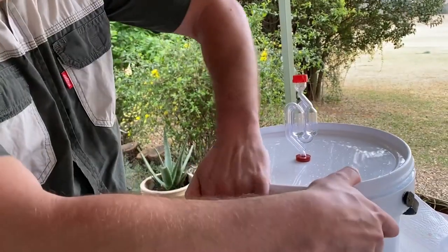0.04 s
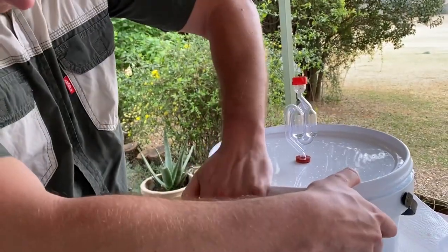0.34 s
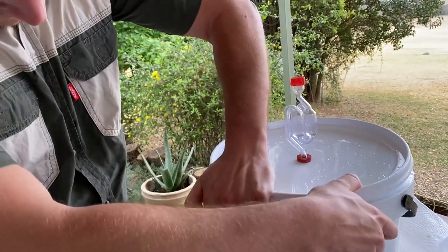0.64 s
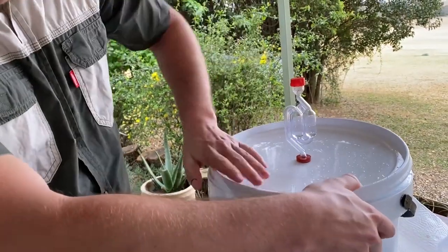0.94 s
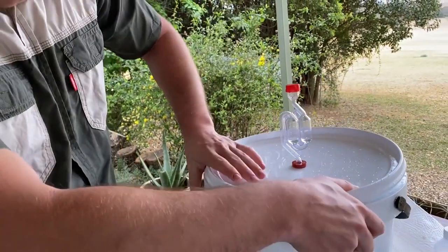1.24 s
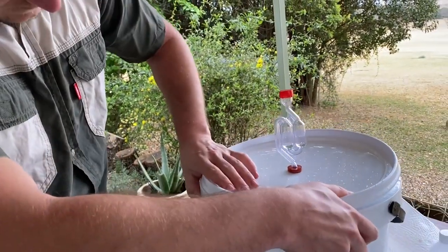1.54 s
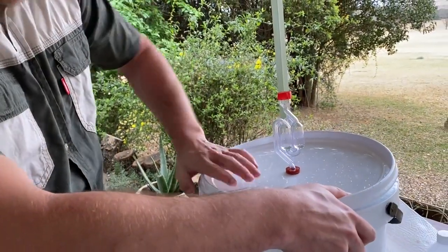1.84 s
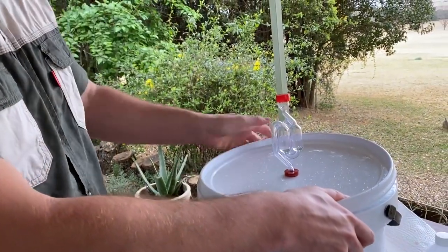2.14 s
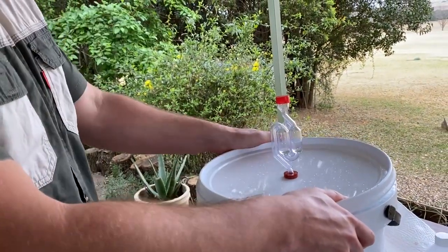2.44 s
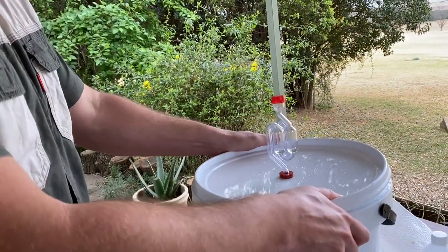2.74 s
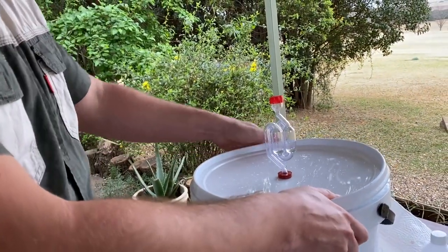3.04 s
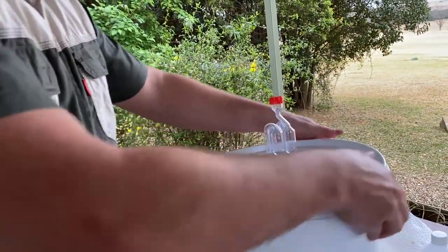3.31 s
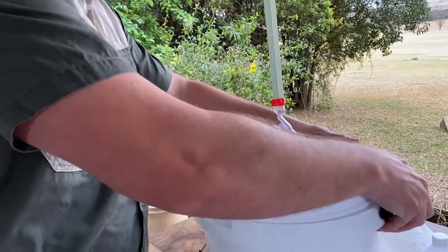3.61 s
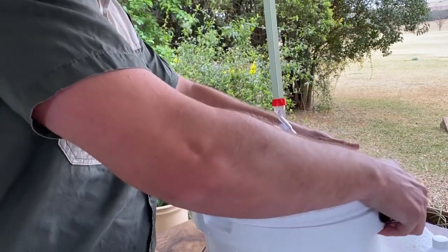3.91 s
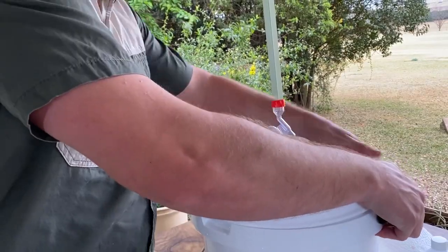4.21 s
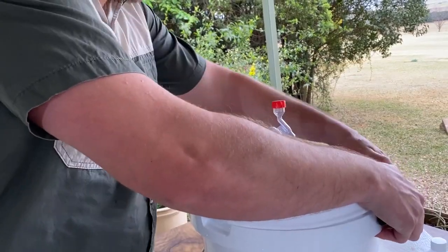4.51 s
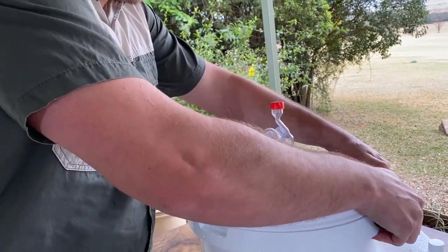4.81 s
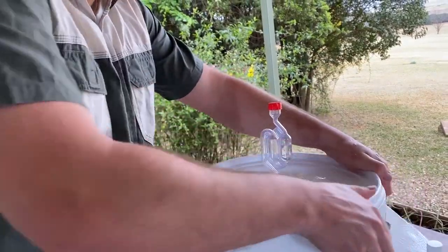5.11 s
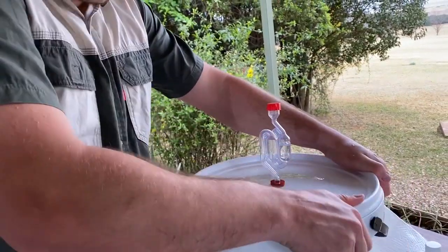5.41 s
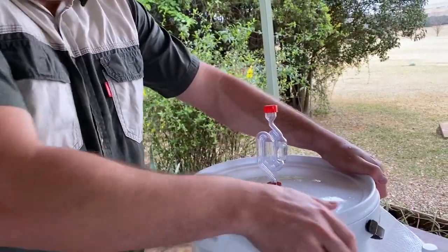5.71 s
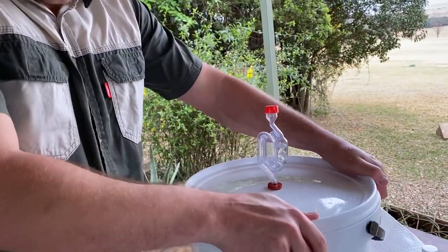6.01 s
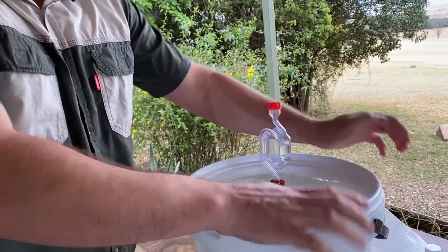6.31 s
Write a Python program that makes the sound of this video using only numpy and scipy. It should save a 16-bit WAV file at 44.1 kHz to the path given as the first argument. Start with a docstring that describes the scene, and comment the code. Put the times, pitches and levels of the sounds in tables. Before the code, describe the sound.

A plastic lid is pressed onto a bucket close to the microphone, on a porch with faint outdoor air and a low hum. It opens with a light sleeve brush, a rim tick and a soft palm thud. At 0.5 seconds a very short scrape ends in the loudest snap, a sharp crack with a hollow boom and a brief echo. A second strong snap comes at 1.6 seconds, and softer ones at 2.7, 3.8 and 4.7. Between them the rim ticks and creaks, palms thud dully, fingers rub with faint squeaks and cloth stirs. The ticks and thuds get busier from 3.6 seconds, with a sharp click at about 5.1. A distant bird gives a thin falling whistle at 2.7 seconds and several more between 4.8 and 5.8. A last finger rub, tick and light thud come at 6.3 seconds.

```python
"""On a porch by a garden, close to a two-port microphone, a plastic fermenting bucket's lid is pressed home.
Over outdoor air and a low hum, a sleeve brushes, the rim ticks and a palm thuds. At 0.5 s the bead
scrapes over the lip and snaps in, with a crack, a flex of the lid and a boom of the bucket. Four softer
snaps follow about a second apart, with ticks, thuds and rubbing fingers between them. From 2.7 s a far
bird whistles now and then; the hands press a last time at 6.3 s."""
import sys
import numpy as np
from scipy import signal
from scipy.fft import rfft, irfft
from scipy.io import wavfile

SR = 44100
rng = np.random.default_rng(int(sys.argv[2]) if len(sys.argv) > 2 else 0)


def dump_mix(stems):
    """Bounce the given channels to the path in sys.argv[1] as a 16-bit WAV at rate SR."""
    frames = np.atleast_2d(stems).T  # one column per channel
    limited = np.clip(frames, -1, 1)  # hard clip at full scale
    pcm = np.round(limited * 32767).astype(np.int16)
    wavfile.write(sys.argv[1], SR, pcm)


N = 280123

# spectrum of plastic slipping on plastic: f/Hz, relative level/dB
SLIP_SPECTRUM = [(100, -10.5), (400, -3.5), (750, -2), (950, -3), (1400, 2), (1900, -1.5), (2400, -2),
                 (3050, -4.5), (4400, -6.5), (5600, -8.5), (7000, -6), (8500, -11), (10000, -12.5),
                 (16000, -23)]


def snaps(directions=3, length_s=0.00135, quickening=0.35):
    """The bead jumps the lip; the crack leaves in several directions, each with its own grain and echo."""
    # snaps: t/s, crack/dB, tilt/(dB/octave), rim ring/Hz, rim ring/dB, skirt knock/Hz, skirt knock/dB,
    # lid flex/Hz, lid flex/dB, wall modes/dB, air cushion/dB, deep sway/dB, echo against the crack/dB
    jumps = [(0.5237, -1, 1, 1548, 1, 666.5, -5, 256.4, 3.5, -14, -34, -20, 3),
             (1.5711, -4, 0.45, 2330, -9.5, 1446, -16, 205, -3.5, -17, -43.5, -17.5, -0.5),
             (2.6916, -17, 0.7, 3120, -26.5, 916, -17, 228.3, -7, -19.5, -19.5, -21.5, 6.5),
             (3.8216, -12, 1, 2310, -19.5, 410, -34, 189, -16, -10, -24, -24, 1.5),
             (4.6814, -23.5, .5, 2300, -34, 380, -10.5, 169, -9, -17, -39, -18.5, 11.5)]
    # rim modes struck by every snap: f/Hz, level against the crack/dB, t60/s
    rim_modes = [(3100, -8, 0.016), (6330, -21.5, .008)]
    direct, wet = np.zeros((2, 2, N))
    for s, crack_db, tilt_db, rim_hz, rim_db, knock_hz, knock_db, *bucket, sway_db, echo_db in jumps:
        decay_s = length_s * amp(-quickening * crack_db)  # the harder, the sooner over
        slip = crack_db, decay_s, tilt_db, rim_hz, rim_db
        body = boom(*bucket) + sway(sway_db)
        body += ring(knock_hz, knock_db, t60=0.0099, turn=0.2)
        body += sum(ring(hz, crack_db + db, t60) for hz, db, t60 in rim_modes)
        add(direct, s, crack(*slip, ring_t60=0.014))
        add(direct, s, body)
        add(wet, s, echoes(body))
        for _ in range(directions):
            add(wet, s, amp(echo_db) / np.sqrt(directions) * echoes(crack(*slip)))
    return direct, wet


def crack(db, decay_s, tilt_db, ring_hz, ring_db, ring_t60=0.0078, size=2048):
    """A burst of tiny slips, and the short ring of the stretch of rim where they happen."""
    t = np.arange(size) / SR
    fade = np.exp(-t / decay_s) * (1 - np.exp(-t / (0.2 * decay_s)))
    burst = port_noise(size, likeness=0.93) * fade
    burst *= 1.05 * np.linalg.norm(fade) / np.linalg.norm(burst, axis=1, keepdims=True)
    sound = amp(db) * colour(burst, SLIP_SPECTRUM, tilt_db)
    return sound + ring(ring_hz, ring_db, ring_t60, turn=0.13, size=sound.shape[1])


def boom(flex_hz, flex_db, wall_db, cushion_db):
    """The lid flexes, feeding the wall modes near its own pitch, and bounces on the air inside."""
    # modes of the bucket wall and lid: f/Hz, relative level/dB, t60/s
    wall_modes = [(140, 4, 0.34), (161.6, 0.5, 0.29), (193.3, -7, 0.15), (222, -5, 0.2), (272, -1.5, 0.077),
                  (311, -9.5, 0.11), (441, -17.5, .16), (487, -18.5, .18), (565, -23.5, 0.094),
                  (651, -21, 0.18), (753, -17.5, 0.17)]
    sound = ring(flex_hz, flex_db, t60=0.066, turn=0.5) + ring(70, cushion_db, t60=0.67, turn=1.3)
    for (hz, db, t60), scatter in zip(wall_modes, rng.standard_normal(len(wall_modes))):
        mismatch_db = -7 * min(abs(np.log2(hz / flex_hz)), 1)
        mode = ring(hz, wall_db + db + mismatch_db, t60, turn=290 / hz + 0.79 * scatter)
        sound += mode * rng.choice([-1, 1])
    return sound


def sway(db, from_hz=130, to_hz=30, fall_s=0.038, peak_s=0.074):
    """Slow bending waves: the lower they are, the later they arrive, so the boom sinks in pitch."""
    t = np.arange(SR) / SR
    cycles = np.cumsum(to_hz + (from_hz - to_hz) * np.exp(-t / fall_s)) / SR
    lag = 1.8 * (1 - np.exp(-t / peak_s)) * np.array([[1], [-1]])  # near field: the ports drift apart
    envelope = t / peak_s * np.exp(1 - t / peak_s)
    return amp(db) * envelope * np.sin(2 * np.pi * cycles + lag)


def ring(hz, db, t60, turn=0, size=SR):
    """A struck mode; the two ports hear it `turn` radians out of step."""
    t = np.arange(size) / SR
    swing = np.sin(2 * np.pi * hz * t + np.array([[turn], [-turn]]) / 2)
    return amp(db - 60 * t / t60) * swing * (1 - np.exp(-4 * hz * t))


def tick(db, tilt_db, ring_hz, ring_db, length_s=0.0003, quickening=0.55):
    """A small slip of the rim: the harder, the shorter."""
    return crack(db, length_s * amp(-quickening * db), tilt_db, ring_hz, ring_db)


def rim_ticks():
    """The rim gives in small slips under the hands."""
    # slips: t/s, level/dB, tilt/(dB/octave), ring/Hz, ring/dB
    slips = [(0.091, -27.5, -2, 1580, -23.5), (0.2465, -53.5, -7.5, 1465, -44),
             (0.451, -37.5, -4, 1370, -61.5), (0.796, -48.5, 1.5, 1260, -31), (0.811, -43, 0, 1520, -34.5),
             (1.1832, -39, -11, 1200, -50), (1.201, -43.5, 1, 1150, -60), (1.2218, -43.5, -1, 1220, -56),
             (1.941, -44, 1, 1535, -56), (1.952, -43.5, -1, 1496, -46.5),
             (2.2325, -37.5, -1.5, 1180, -44.5), (3.1976, -42, -8, 1397, -42.5),
             (3.2797, -50.5, -6, 1415, -55.5), (3.584, -35.5, 0, 1020, -25.5),
             (3.608, -40, -5.5, 1120, -52), (3.743, -31, -.5, 1150, -42), (3.9888, -25, -3.5, 1222, -13.5),
             (4.0784, -41, -10, 1080, -40), (4.202, -56, -3.5, 1220, -38), (4.626, -28, -6, 1720, -37),
             (4.635, -25, -9.5, 1616, -40), (4.644, -18, -.5, 1630, -41), (5.016, -36.5, -3, 1600, -33),
             (5.119, -44.5, -2, 1220, -29.5), (5.1474, -15, 3.5, 945, -21), (5.149, -22.5, -8, 1210, -12),
             (5.171, -27.5, -4.5, 1080, -37), (5.2459, -31, -0.5, 1101, -24.5),
             (6.303, -44, 1.5, 1520, -56), (6.3166, -30.5, -3.5, 900, -50)]
    mix = np.zeros((2, N))
    for s, *slip in slips:
        add(mix, s, tick(*slip))
    return mix


def palm_thuds():
    """A palm bears down on the lid and the bucket booms softly."""
    # presses: t/s, lid flex/dB, lid flex/Hz, air cushion/dB
    presses = [(0.095, -36.5, 149, -39.5), (0.81, -48.5, 198.7, -32.5), (1.198, -33, 222, -51.5),
               (1.222, -32.5, 220, -55), (1.82, -27.5, 165, -30.5), (2.291, -50, 108, -37),
               (2.446, -44, 251, -49), (3.585, -33, 202, -36.5), (3.746, -21, 174, -28.5),
               (3.987, -34, 196, -36), (4.195, -45.5, 100, -36.5), (4.428, -36.5, 137, -47),
               (4.738, -38.5, 70, -41), (5.019, -32, 105, -29.5), (5.149, -31.5, 237, -49),
               (5.245, -36, 293, -40), (5.464, -39, 92, -32), (5.716, -39.5, 120, -47),
               (6.316, -33, 175, -61)]
    mix = np.zeros((2, N))
    for s, db, flex_hz, cushion_db in presses:
        add(mix, s, boom(flex_hz, db, wall_db=db - 3, cushion_db=cushion_db))
    return mix


def bead_scrapes(growth_db=24.5):
    """The bead grinds over the lip, louder and louder until it gives."""
    # scrapes: start/s, end/s, final level/dB
    scrapes = [(0.507, 0.522, -29.5), (1.563, 1.573, -28), (3.817, 3.833, -25.5), (4.602, 4.643, -35.5),
               (4.66, 4.688, -30.5), (4.99, 5.014, -54)]
    mix = np.zeros((2, N))
    for start, end, db in scrapes:
        grains = grind(start, end, SLIP_SPECTRUM, grain_db=-1.0)
        add(mix, start, grains * amp(db + growth_db * np.linspace(-1, 0, grains.shape[1])))
    return mix


def finger_rubs():
    """Skin slips on the plastic with a low and a high squeak."""
    # rubs: start/s, end/s, low squeak/dB, high squeak/dB
    rubs = [(0.776, 0.823, -50.5, -61.5), (1.045, 1.121, -80, -65), (1.502, 1.54, -55, -71),
            (1.781, 1.831, -52, -64), (2.285, 2.301, -57.5, -62), (3.056, 3.112, -59.5, -71),
            (3.909, 4.02, -52, -68), (4.19, 4.236, -72, -55.5), (4.252, 4.272, -59, -50.5),
            (4.27, 4.334, -58, -54.5), (5.133, 5.168, -47, -75), (6.251, 6.3, -44.5, -48.5)]
    # spectra of the two squeaks: f/Hz, relative level/dB
    low_squeak = [(200, -12), (800, -7), (1400, -4.5), (1900, -8.5), (2700, -18), (8000, -51.5)]
    high_squeak = [(1000, -43.5), (4800, -11.5), (6100, 3), (7000, 3), (8200, -9.5), (11000, -8.5),
                   (13500, -10), (16000, -13)]
    mix = np.zeros((2, N))
    for start, end, low_db, high_db in rubs:
        low = amp(low_db) * grind(start, end, low_squeak, grain_db=4.5)
        high = amp(high_db) * grind(start, end, high_squeak, grain_db=4.5)
        add(mix, start, (low + high) * signal.windows.tukey(low.shape[1], 0.5))
    return mix


def grind(start, end, spectrum, grain_db, size=8192):
    """Stick and slip: a dense run of grains of uneven size."""
    count = int(np.clip((end - start) * SR, 64, size))
    grains = port_noise(size, likeness=0.7)
    grains *= amp(grain_db * np.repeat(rng.standard_normal(size // 32), 32))
    return unit_rms(colour(grains, spectrum)[:, :count])


def rim_creaks(per_s=2, mean_db=-58, spread_db=6.5):
    """The strained rim creaks faintly at random moments."""
    mix = np.zeros((2, N))
    for when, force in rng.random((round(per_s * N / SR), 2)):
        db = mean_db + spread_db * (2 * force - 1)
        add(mix, when * N / SR, tick(db, tilt_db=-3, ring_hz=1140, ring_db=db))
    return mix


def ports(x, right_delay_s=1.9e-5):
    """The bucket is close and to one side: each port has its own colour, and the right hears it later."""
    # the bucket's near field at the microphone: f/Hz, left over right/dB
    balance = [(60, -1.5), (110, -2.5), (200, -1), (380, 2.5), (700, 2.0), (1290, 1.5), (2380, 2.0),
               (4400, 3.5), (8120, 0), (15000, 1.0)]
    hz = np.fft.rfftfreq(N, 1 / SR)
    lean = amp(read(balance, hz) / 2)
    delay = np.exp(-2j * np.pi * hz * right_delay_s)
    return irfft(rfft(x) * np.array([lean, delay / lean]), N)


def echoes(x):
    """A sound rings on briefly in the plastic shell, and longer under the porch roof."""
    # echo bands of the two spaces: f/Hz, level/dB, t60/s
    shell = [(59.6, -13.5, 0.17), (245, -11.5, 0.021), (505.6, -2.5, 0.14), (1500, -7, .05),
             (4000, -10, 0.044), (12000, -15, .035)]
    porch = [(50, -1, 0.59), (202.2, -14.5, 0.2), (398, 0.5, 0.19), (660, -16, 0.8), (1500, -15.5, 0.27),
             (3500, -16, 0.3), (7000, -18, 0.25), (14000, -18, 0.2)]
    return tail(x, shell, onset_s=0.0029, likeness=0.85) + tail(x, porch, onset_s=0.01, likeness=1.0)


def tail(x, bands, onset_s, likeness, unrelated_hz=8000, size=24576):
    """Dense echoes from all sides; each band dies at its own speed, and the treble is the widest."""
    hz, t, noise = signal.stft(rng.standard_normal((2, size)), SR, nperseg=256)
    field = correlate(noise, likeness * np.sinc(hz / unrelated_hz)[:, None])
    t60 = np.maximum(read(bands, hz, column=2), 0.01)[:, None]
    decay = amp(read(bands, hz)[:, None] - 60 * t / t60)
    equal_energy = np.sqrt(2 * np.log(1000) / (t60 * SR))
    taps = signal.istft(field * decay * equal_energy, SR, nperseg=256)[1]
    taps *= 1 - np.exp(-(np.arange(taps.shape[1]) / SR / onset_s) ** 2)
    return signal.fftconvolve(x, taps, axes=1)[:, :N]


def sleeves(half_width_s=0.12, rest_db=-73.5):
    """A sleeve brushes the shirt as an arm moves; the cloth stirs faintly in between."""
    # brushes: peak t/s, level/dB
    brushes = [(0.03, -59), (1.169, -63), (1.87, -59.5), (2.47, -65), (2.98, -63), (3.68, -59.5),
               (4.34, -65.5), (5.1, -68.5), (6.28, -57.5)]
    # spectrum of shirt cloth: f/Hz, relative level/dB
    cloth = [(100, 1.5), (300, 9), (600, 1), (1200, 0), (2500, -4), (5000, -9), (8000, -10), (15000, -26)]
    t = np.arange(N) / SR
    fibres = colour(port_noise(N, likeness=0.6), cloth)[:, :N] * swell(rate_hz=25, depth_db=2)
    brush_power = sum(amp(db) ** 2 * np.exp(-((t - s) / half_width_s) ** 2) for s, db in brushes)
    return unit_rms(fibres) * np.sqrt(amp(rest_db) ** 2 + brush_power)


def bird(fall_octaves_per_s=0.96):
    """Far off, thin whistles that all fall at one rate, smeared by the trees."""
    # whistles: t/s, length/s, starting f/Hz, relative level/dB, blur/Hz
    whistles = [(2.712, 0.15, 2170, -55.5, 220), (4.822, 0.087, 2120, -59, 60.4),
                (4.878, 0.084, 2048, -53.5, 69.3), (5.335, .11, 3006, -55.5, 420),
                (5.457, 0.11, 2804, -58.5, 350), (5.656, 0.076, 2533, -54, 221),
                (5.733, 0.055, 2370, -59, 200)]
    trees = [(1002, -3.5, 0.39), (4030, -6, 1.0)]  # echo bands: f/Hz, level/dB, t60/s
    song = np.zeros((2, N))
    for start, length, from_hz, db, blur_hz in whistles:
        hz = from_hz * 2 ** (-fall_octaves_per_s * np.arange(0, length, 1 / SR))
        add(song, start, amp(db) * fuzzy_tone(hz, blur_hz) * signal.windows.tukey(len(hz), 0.6))
    return amp(-6) * song + tail(song, trees, onset_s=0.012, likeness=0.49)


def garden(air_db=-64.5, rumble_below_hz=300):
    """Outdoor air beyond the porch, with a softly gusting rumble."""
    # spectrum of the outdoor air: f/Hz, relative level/dB
    air_spectrum = [(15, -2.5), (27, -3.5), (42, -10.5), (62, -20), (90, -31.5), (130, -28.5), (250, -39),
                    (420, -47.5), (900, -47.5), (1600, -50.5), (2300, -51), (4000, -54), (7500, -58),
                    (9500, -63.5), (15500, -65.5)]
    # how alike the two ports hear it: f/Hz, correlation
    likeness = [(25, -0.69), (45, -0.31), (70, .85), (150, .1), (300, .1), (800, .55), (3000, 0.19),
                (12000, -.1)]
    hz = np.fft.rfftfreq(N, 1 / SR)
    field = correlate(rfft(rng.standard_normal((2, N))), read(likeness, hz))
    field *= amp(read(air_spectrum, hz))
    air = irfft(field * (hz >= rumble_below_hz), N)
    rumble = irfft(field * (hz < rumble_below_hz), N) * swell(rate_hz=2.4, depth_db=3.5)
    return amp(air_db) * (air + rumble) / np.std(air.mean(0))


def hum(hz=68.5):
    """A low hum in the background: a steady tone under a wavering one."""
    pitch = np.full(N, hz)
    steady = np.sin(2 * np.pi * np.cumsum(pitch) / SR)
    return amp(-65.5) * steady + amp(-58.5) * fuzzy_tone(pitch, width_hz=15)


def fuzzy_tone(hz, width_hz):
    """A narrow band of noise that follows the pitch curve hz."""
    band = np.exp(-(np.fft.fftfreq(N, 1 / SR) / width_hz) ** 2)
    waver = np.fft.ifft(np.fft.fft(rng.standard_normal(N)) * band)[:len(hz)]
    return unit_rms((waver * np.exp(2j * np.pi * np.cumsum(hz) / SR)).real)


def swell(rate_hz, depth_db):
    """A gain that drifts at random."""
    knots = rng.standard_normal(256)
    return amp(depth_db * np.interp(np.arange(N) / SR * rate_hz, np.arange(256), knots))


def colour(x, spectrum, tilt_db=0, size=2048):
    """Causal filter of unit power with the given spectrum, tilted by tilt_db an octave above 500 Hz."""
    hz = abs(np.fft.fftfreq(size, 1 / SR))
    octaves = np.log2(np.maximum(hz, 500) / 2000)
    log_gain = np.log(amp(read(spectrum, hz) + tilt_db * octaves))
    taps = np.fft.ifft(np.exp(np.conj(signal.hilbert(log_gain)))).real
    return signal.fftconvolve(x, taps[None] / np.linalg.norm(taps), axes=1)


def port_noise(count, likeness):
    """White noise at the two microphone ports, partly alike."""
    return correlate(rng.standard_normal((2, count)), likeness)


def correlate(noises, likeness):
    """Blends two unrelated noises into a left and a right with the given correlation."""
    left, other = noises
    likeness = np.clip(likeness, -1, 1)
    return np.array([left, likeness * left + np.sqrt(1 - likeness ** 2) * other])


def read(table, hz, column=1):
    """One column of a table, interpolated on a log-frequency axis."""
    table = np.array(table, float)
    return np.interp(np.log(hz + 1), np.log(table[:, 0] + 1), table[:, column])


def add(mix, s, sound):
    """Lays a sound into the mix at time s."""
    part = mix[:, max(round(s * SR), 0):][:, :sound.shape[-1]]
    part += sound[..., :part.shape[1]]


def amp(db):
    """Decibels to gain."""
    return 10 ** (np.asarray(db) / 20)


def unit_rms(x):
    """Scales to rms 1."""
    return x / np.sqrt(np.mean(x ** 2) + 1e-20)


def scene():
    """Bucket and hands close to the microphone, their echoes on the porch, and the garden behind."""
    direct, snap_echoes = snaps()
    hands = rim_ticks() + palm_thuds() + bead_scrapes() + finger_rubs() + rim_creaks()
    return ports(direct + hands) + snap_echoes + echoes(hands) + sleeves() + bird() + garden() + hum()


def record(dry):
    """The hardest snap overloads the microphone; the treble ends at 16.1 kHz."""
    lowpass = signal.firwin(511, 16100, window=("kaiser", 9), fs=SR)
    return signal.oaconvolve(np.clip(dry, -1, 1), lowpass[None], "same")


dry = scene()
out = record(dry)
dump_mix(out)
```